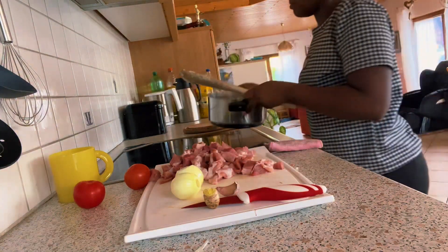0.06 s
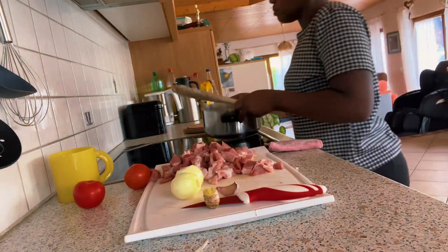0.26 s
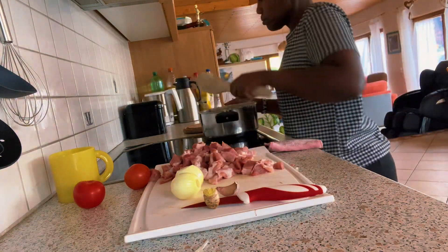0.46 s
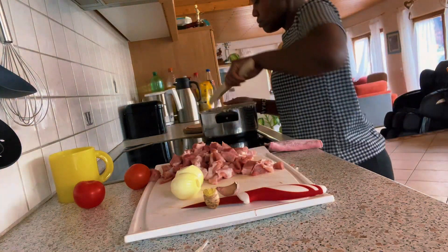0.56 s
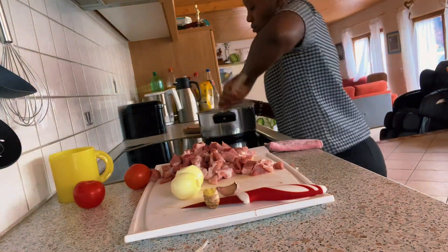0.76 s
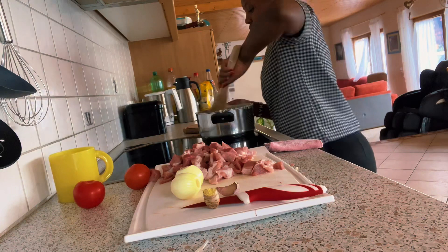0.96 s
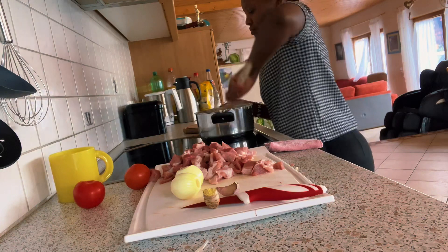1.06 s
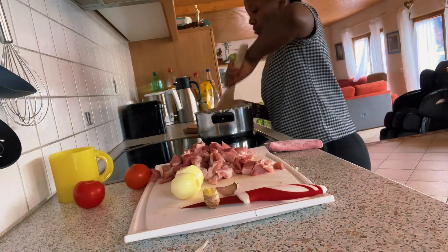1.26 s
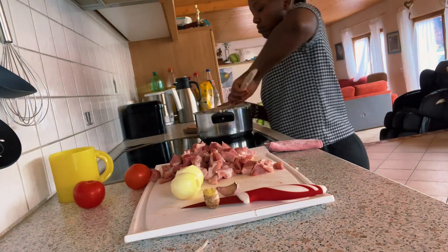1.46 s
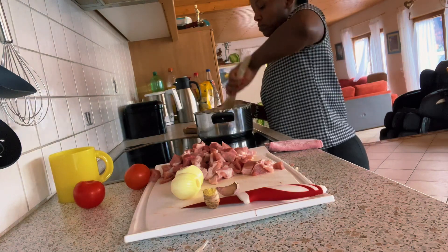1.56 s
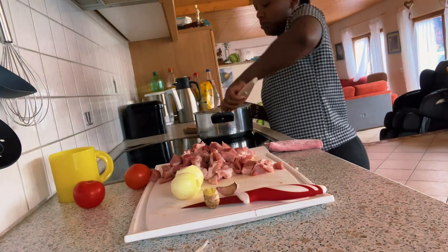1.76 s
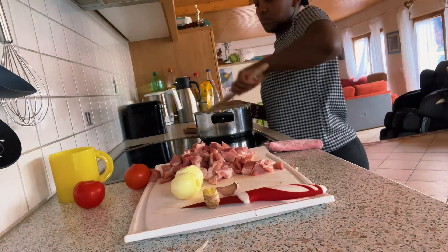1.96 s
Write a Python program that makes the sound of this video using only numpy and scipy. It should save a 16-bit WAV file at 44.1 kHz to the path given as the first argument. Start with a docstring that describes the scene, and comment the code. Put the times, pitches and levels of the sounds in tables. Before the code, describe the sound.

A metal pot is set down on a glass hob at about 0.23 s, bouncing and rocking in heavy, dull clunks with a short metallic ring until 0.43 s. A softer, low thud follows at 0.65 s, with a brief bright scrape near 0.75 s. Faint wooden spoon scraping continues, with weak bumps around 1.25 and 1.65 s and a barely heard hum near 1.85 s. Low kitchen rumble, short room echo.

```python
"""Over the steady rumble and hiss of a kitchen, shaped noise, a spoon scrape is faintly heard: flickering grains.
From 0.23 s a metal pot is set down on a glass hob, bounces and rocks: each blow sums decaying modes of cabinet,
hob, pot belly and pot ring with a noise crack, and a small room answers with banded decaying noise.
From about 0.6 s it bumps again as the wooden spoon works stiff food, its scrape swelling and sinking.
Near 1.85 s the dragged pot adds a faint hum, one short sine."""
import sys
import numpy as np
from scipy import signal
from scipy.fft import rfft, irfft
from scipy.io import wavfile
from scipy.ndimage import uniform_filter1d

SR = 44100
rng = np.random.default_rng(int(sys.argv[2]) if len(sys.argv) > 2 else 0)


def store_wav(level_fs):
    """Save 16-bit WAV to argv[1]."""
    pcm = np.round(np.clip(np.atleast_2d(level_fs), -1, 1) * 32767)
    wavfile.write(sys.argv[1], SR, pcm.T.astype(np.int16))


N = 88200
ALIKE_HZ = 386  # crossover: the channels are mostly alike below it, mostly unrelated above
RIGHT_LATE_S, LEFT_DB = 0.000297, 0.73  # lag of the right channel; excess level of the left


def undb(db):
    """Level definition: an amplitude ratio is 10 to the power level/20."""
    return 10 ** (np.asarray(db) / 20)


def unit(x):
    """Normalisation to a root-mean-square value of 1."""
    return x / np.sqrt(np.mean(x ** 2))


def shape(x, gain):
    """Linear filtering: the spectrum is multiplied by a gain that is a function of frequency."""
    hz = np.maximum(np.fft.rfftfreq(x.shape[-1], 1 / SR), 1)
    return irfft(rfft(x) * gain(hz), x.shape[-1])


def read(table, hz, col=1):
    """Interpolation of a table column on a logarithmic frequency axis."""
    table = np.array(table)
    return np.interp(np.log(hz), np.log(table[:, 0]), table[:, col])


def highpass(hz, corner_hz):
    """Second-order roll-off: the gain is one half at the corner."""
    return hz ** 2 / (hz ** 2 + corner_hz ** 2)


# Resonances shared by hiss, scrape and (at half the lift) crack: [f/Hz, width/Hz, lift/dB]
RESONANCES = [(1255, 76, 7.5), (1770, 210, 5.5), (2596, 220, 6.5), (4334, 310, 7), (6000, 1200, 3),
              (11850, 720, 3.5)]


def resonance_gain(hz):
    """Resonance: bell-shaped lifts in level, added in decibels."""
    lift_db = sum(db / (1 + (2 * (hz - f) / width) ** 2) for f, width, db in RESONANCES)
    return undb(lift_db)


def pair(x):
    """Interchannel coherence: three noises become two channels with shared bass and unrelated treble."""
    alike = lambda hz: 1 / (1 + (hz / ALIKE_HZ) ** 2)
    shared = shape(x[2], lambda hz: np.sqrt(alike(hz)))
    separate = shape(x[:2], lambda hz: np.sqrt(1 - alike(hz)))
    return shared + separate


def walk(rate):
    """Low-pass random process: noise averaged twice over 1/rate seconds wanders slowly, with spread 1."""
    k = int(SR / rate)
    once = uniform_filter1d(rng.standard_normal(N), k)
    return unit(uniform_filter1d(once, k))


# Spectrum of the kitchen noise before the shared resonances: [f/Hz, spectral level/dB per Hz]
HISS_SPECTRUM = [(15, -36), (25, -21), (55, -2), (463, -25), (734, -25.5), (863, -25), (1290, -19),
                 (1840, -29), (3920, -25), (4370, -28), (16000, -62)]
HISS_DB = -58


def hiss():
    """Stationary noise: the steady low rumble and hiss of the kitchen."""
    noise = pair(rng.standard_normal((3, N)))
    colour = lambda hz: undb(read(HISS_SPECTRUM, hz)) * resonance_gain(hz)
    return undb(HISS_DB) * unit(shape(noise, colour))


# Level contour of the scrape before flicker: [t/s, level/dB]
SCRAPE_LEVEL = [(0, -68.5), (0.398, -68.5), (.44, -55), (.55, -88), (0.621, -60.5), (.69, -54),
                (0.721, -49.5), (0.747, -38.5), (0.777, -53.5), (.86, -56), (0.929, -53.5), (1.018, -50.5),
                (1.12, -52.5), (1.231, -53.5), (1.33, -52.5), (1.45, -52.5), (1.52, -61.5), (1.649, -55),
                (1.792, -55.5), (1.93, -58), (1.99, -53.5)]
# Colour of the rubbed pot before resonances and high-pass: [f/Hz, spectral level/dB per Hz]
RUB_SPECTRUM = [(290, -18), (500, -1), (621, -27), (678, -8.5), (1250, -7), (2330, -14.5), (2690, -12.5),
                (3290, -11.5), (11600, -16), (16000, -28)]
GRAIN_DB, FLICKER_DB = 4, 2.84  # scale of the uneven grain sizes; spread of the flicker
CHURN_DB, CHURN_HZ = -6.5, (127, 324)  # level relative to the rub; centres for hob and pot belly


def scrape():
    """Friction noise: dense tiny grains of uneven size; stirring also shakes hob and belly in a low churn."""
    size_db = GRAIN_DB * np.minimum(rng.exponential(size=N), 4)
    grains = rng.standard_normal((2, N)) * undb(size_db)
    colour = lambda hz: undb(read(RUB_SPECTRUM, hz)) * resonance_gain(hz) * highpass(hz, 600)
    rub = unit(shape(grains, colour))
    bands = lambda hz: sum(100 / f / (1 + (4.9 * np.log2(hz / f)) ** 2) for f in CHURN_HZ)
    churn = unit(shape(pair(rng.standard_normal((3, N))), bands))
    s, db = np.array(SCRAPE_LEVEL).T
    level_db = np.interp(np.arange(N) / SR, s, db) + FLICKER_DB * walk(34)
    return (rub + undb(CHURN_DB) * churn) * undb(level_db)


SCATTER_DB, SCATTER_PITCH = 1.8, .008  # blow-to-blow spread at 1 kHz (pitch as a fraction); less for low modes


def ring(modes, rise_cycles, t, lift_db):
    """Modal superposition: damped sines swell, then die; high ones vary more and lie out of step between channels."""
    hz, db, t60 = np.array(modes).T[:, :, None]
    chance = rng.standard_normal((3, len(modes), 1)) * np.sqrt(hz / 1000)
    db = db + lift_db(hz) + SCATTER_DB * chance[1]
    hz = hz * (1 + SCATTER_PITCH * chance[0])
    t = np.maximum(t, 0)
    swell = (1 - np.exp(-t * hz / rise_cycles)) ** 2
    envelope = undb(db - 60 * t / t60) * swell
    lag = 2 * np.pi * hz * RIGHT_LATE_S + chance[2] * np.clip(hz / ALIKE_HZ - .3, 0, 2)
    return np.array([(envelope * np.sin(2 * np.pi * hz * t - side * lag)).sum(0) for side in (0, 1)])


# Contact noise before tilt, resonances and high-pass: [f/Hz, spectral level/dB per Hz]
CRACK_SPECTRUM = [(290, -12), (500, -1), (831, -3), (988, 2.5), (1210, -6), (2130, -10), (3920, -14.5),
                  (16000, -41)]
CRACK_S, RATTLE_S, RATTLE_DB = 0.0068, 0.02, -3  # decay time constants; rattle level relative to the crack
CRACK_TILT_SHARE = 0.18  # a blow that rings bright also cracks bright
CRACK_SHARED = 0.21  # share of the crack's power common to both channels
CLUMP_DB, CLUMP = 2.5, 88  # spread in size of the tiny contacts; their length in samples
CRACK_RISE_S, SOFT_DB, SOFT_RISE_S_PER_DB = 0.0022, -23, -0.2


def crack(t, tilt_db, crack_db):
    """Impact noise: clumped contacts with two exponential decays, the crack and a short rattle."""
    sizes = undb(CLUMP_DB * rng.standard_normal(len(t) // CLUMP + 1))
    clumps = uniform_filter1d(np.repeat(sizes, CLUMP), CLUMP // 2)[:len(t)]
    left, right, both = rng.standard_normal((3, len(t)))
    late = np.roll(both, round(RIGHT_LATE_S * SR))
    noise = np.sqrt(1 - CRACK_SHARED) * np.array([left, right]) + np.sqrt(CRACK_SHARED) * np.array([both, late])

    def colour(hz):
        db = read(CRACK_SPECTRUM, hz) + CRACK_TILT_SHARE * tilt_db * np.log2(hz / 1000)
        return undb(db) * np.sqrt(resonance_gain(hz)) * highpass(hz, 450)

    # below SOFT_DB the rise is negative: an inverted ramp without ceiling, shallower for softer blows
    rise = CRACK_RISE_S + SOFT_RISE_S_PER_DB * max(SOFT_DB - crack_db, 0)
    onset = np.minimum(t / rise, 1)
    decay = np.exp(-t / CRACK_S) + undb(RATTLE_DB) * np.exp(-t / RATTLE_S)
    return undb(crack_db) * unit(shape(noise, colour)) * unit(clumps) * decay * onset


# Modes of the four struck bodies, levels before each blow's own: [f/Hz, level/dB, t60/s]
CABINET_MODES = [(56.74, -5.5, 0.61), (74.6, -1.5, 0.17)]
HOB_MODES = [(102.9, 0.082, 0.36), (128.6, 0.17, 0.3), (154.2, 0.63, 0.14), (173.8, 0.11, 0.19)]
BELLY_MODES = [(291.4, 1, 0.092), (309.6, 1.72, 0.11), (350, 2.1, 0.074), (368, 0.67, 0.043)]
RING_MODES = [(549, -3.5, 0.075), (591.8, -4.5, 0.072), (773, 0, 0.065), (838, -1.5, 0.073),
              (970, 2, 0.054), (1096, -4, 0.13), (1206, -2.5, 0.13), (1277, 5.5, 0.035), (1368, 0, 0.07),
              (1435, -4.5, 0.047), (1605, -4.5, 0.042), (890.5, -3.5, 0.11)]
# Contacts of the pot; ring level is at 1 kHz, crack level is before the onset ramp:
# [t/s, cabinet boom level/dB, hob thud level/dB, favoured hob f/Hz, belly level/dB, favoured belly f/Hz,
#  ring level/dB, ring tilt/dB per octave, crack level/dB]
POT_BLOWS = [(0.232, -60.5, -10, 174.3, -10, 355, -16.5, -2.5, -22.5),
             (.250, -23, -13.5, 146.3, -18.5, 355, -16.5, -1.5, -19),
             (.281, -33, -19, 110, -21.5, 340, -37.5, -16, -31),
             (.326, -19.5, -11.5, 149, -12, 355.5, -23, -9, -22),
             (0.337, -28.5, -10.5, 148.5, -21, 383, -26.5, -2.5, -20.5),
             (0.383, -34.5, -26, 119, -29, 390, -57, -2, -49),
             (.431, -36.5, -29, 114.7, -34.5, 355, -49.5, 4, -42),
             (.649, -25, -8, 146.5, -19.5, 306.5, -32.5, -18, -30),
             (.692, -51, -26, 153, -40, 307, -43, -15, -35), (.730, -57, -28, 150, -47, 315, -37, -10, -33),
             (.742, -24.5, -16.5, 149.6, -29, 330, -41, 11, -36),
             (0.771, -30.5, -26, 112.4, -44, 302, -44.5, -16, -50),
             (.942, -62, -26, 150.8, -46, 308, -59, -11, -44.5),
             (1.24, -55, -32.5, 153, -34, 300, -62, 12, -77),
             (1.261, -49, -31.5, 178, -45, 312, -79, 9, -66),
             (1.602, -46, -29.5, 175.8, -41.5, 307, -65, -9, -81),
             (1.662, -21, -41, 135, -32, 306, -45, -6.5, -45),
             (1.672, -39, -15, 142.4, -43, 314, -50, -8, -44.5),
             (1.686, -35, -24.5, 164, -39, 304, -47, -15, -33),
             (1.729, -28.5, -38.5, 108, -38, 372, -60, -13, -52),
             (1.978, -18, -33, 170, -41.5, 300, -55.5, -3, -58)]
# time constants of the swell: heavy parts take time to start swinging
CABINET_RISE_CYCLES, RISE_CYCLES, RING_RISE_CYCLES = .9, 0.43, 1.4
CABINET_LATE_S, HOB_LATE_S = 0.0203, 0.0067  # the blow travels down through hob and cabinet
BELLY_LATE_S = 0.0032  # the belly swings in just after the contact
FAVOUR_DB = 56.5  # loss per octave away from the mode that the landing spot favours


def blows():
    """Impact excitation: every blow rings all four bodies and adds a crack; returns rings and cracks."""
    out = np.zeros((2, 2, 2 * N))
    t = np.arange(SR // 2) / SR
    fade = np.minimum(10 * (t[-1] - t), 1)  # over the last 0.1 s
    near = lambda db, at: lambda hz: db - FAVOUR_DB * abs(np.log2(hz / at))
    for s, boom_db, thud_db, thud_hz, belly_db, belly_hz, ring_db, tilt_db, crack_db in POT_BLOWS:
        cabinet = ring(CABINET_MODES, CABINET_RISE_CYCLES, t - CABINET_LATE_S, lambda hz: boom_db)
        hob = ring(HOB_MODES, RISE_CYCLES, t - HOB_LATE_S, near(thud_db, thud_hz))
        belly = ring(BELLY_MODES, RISE_CYCLES, t - BELLY_LATE_S, near(belly_db, belly_hz))
        tilted = lambda hz: ring_db + tilt_db * np.log2(hz / 1000)
        pot = ring(RING_MODES, RING_RISE_CYCLES, t, tilted)
        tone = cabinet + hob + belly + pot
        i = int(s * SR)
        out[..., i:i + len(t)] += np.array([tone, crack(t, tilt_db, crack_db)]) * fade
    return out[..., :N]


# Reverberation by frequency, level before build-up: [f/Hz, t60/s, level/dB]
ROOM_DECAY = [(60, 0.71, -20), (143, 0.8, -6.5), (328, 0.41, 1), (840, 0.61, -8), (4100, 0.56, -6),
              (12000, 0.94, -9.5)]
ROOM_BUILD_S = 0.024  # time constant with which the echo builds up


def room(x):
    """Reverberation: the left channel is convolved with half-octave bands of decaying noise, as walls and tiles echo."""
    t, tail = np.arange(SR) / SR, 0
    noise = pair(rng.standard_normal((3, SR)))
    for f in 45 * 2 ** np.arange(0, 8.6, .5):
        band = shape(noise, lambda hz: np.cos(np.pi * np.clip(np.log2(hz / f), -.5, .5)) ** 2)
        t60 = read(ROOM_DECAY, f)
        decay = undb(read(ROOM_DECAY, f, col=2) - 60 * t / t60)
        # the divisor keeps long decays from carrying more energy
        tail = tail + band * decay / np.sqrt(t60 * SR / (2 * np.log(1000)))
    tail = tail * (1 - np.exp(-t / ROOM_BUILD_S))
    return signal.fftconvolve(x[:1], tail, axes=1)[:, :N]


# Faint hum of the pot as the spoon drags: [t/s, length/s, f/Hz, level/dB]
POT_MOANS = [(1.845, 0.038, 415, -52)]


def moans():
    """Amplitude modulation: a soft sine swells and fades under half a sine period."""
    t = np.arange(N) / SR
    total = 0
    for s, length, hz, db in POT_MOANS:
        swell = np.sin(np.pi * np.clip((t - s) / length, 0, 1))
        total = total + undb(db) * swell * np.sin(2 * np.pi * hz * t)
    return total


TONE_WET_DB = -6  # the ringing bodies reach the room weaker than the cracks


def scene():
    """Superposition: kitchen noise, scrape, pot blows, their echo and the hum add linearly."""
    background = hiss() + scrape()
    tone, cracks = blows()
    tone = tone + moans()
    echo = room(undb(TONE_WET_DB) * tone + cracks)
    heard = background + tone + cracks + echo
    return heard * undb([[LEFT_DB / 2], [-LEFT_DB / 2]])


TOP_HZ = 16000


def record(dry):
    """Band limitation: a steep elliptic low-pass removes everything above 16 kHz."""
    lowpass = signal.ellip(10, .2, 70, TOP_HZ, fs=SR, output="sos")
    return signal.sosfilt(lowpass, dry)


dry = scene()
out = record(dry)
store_wav(out)
```